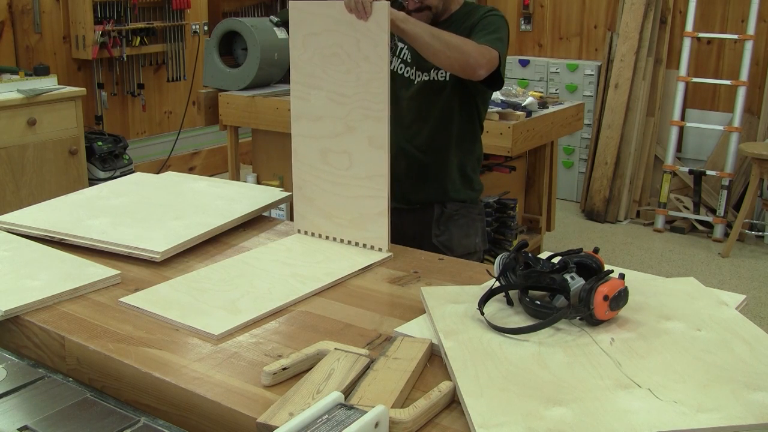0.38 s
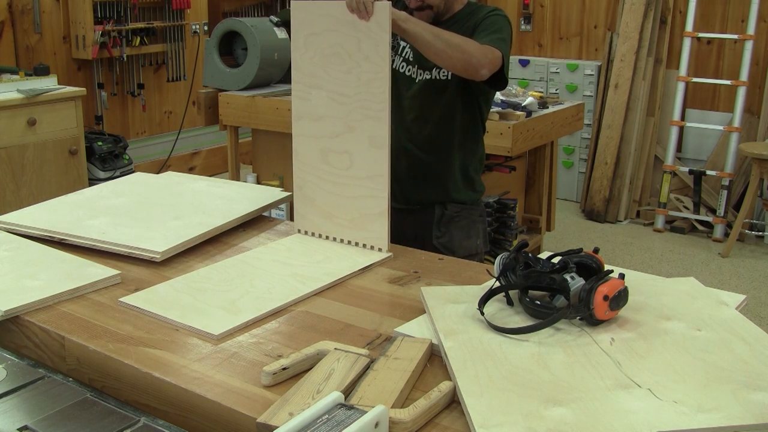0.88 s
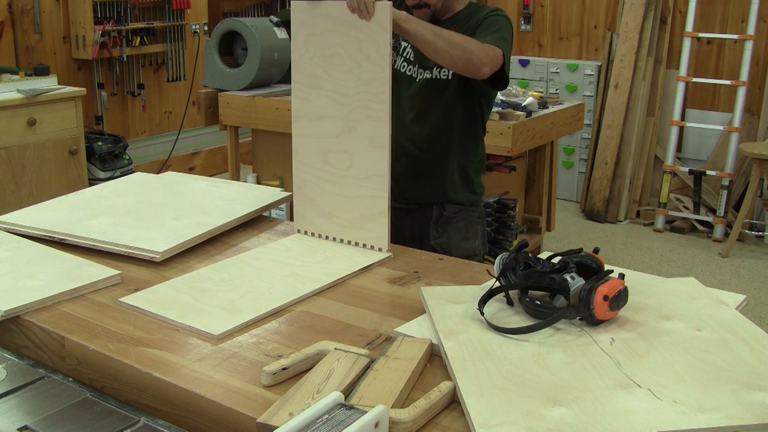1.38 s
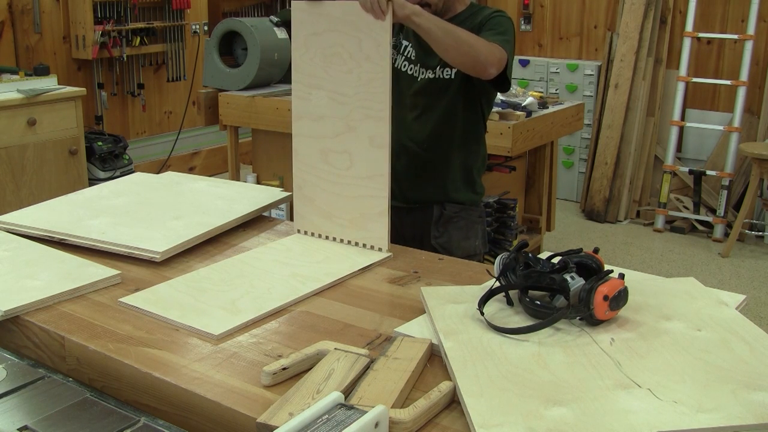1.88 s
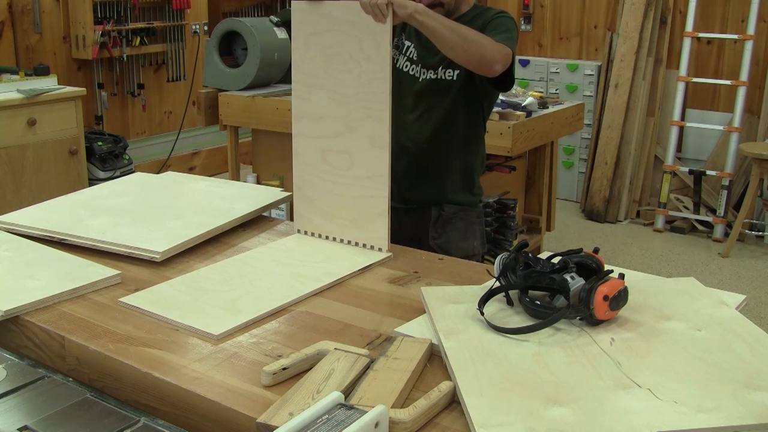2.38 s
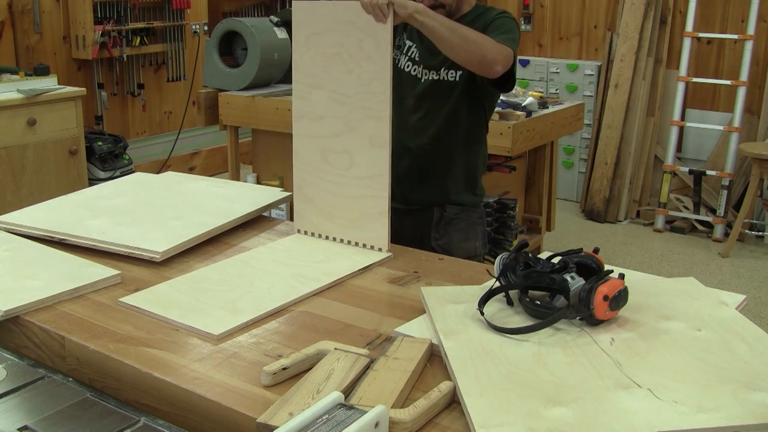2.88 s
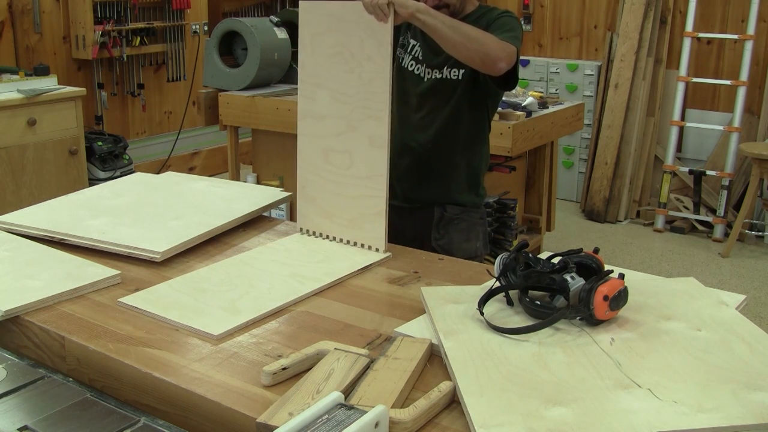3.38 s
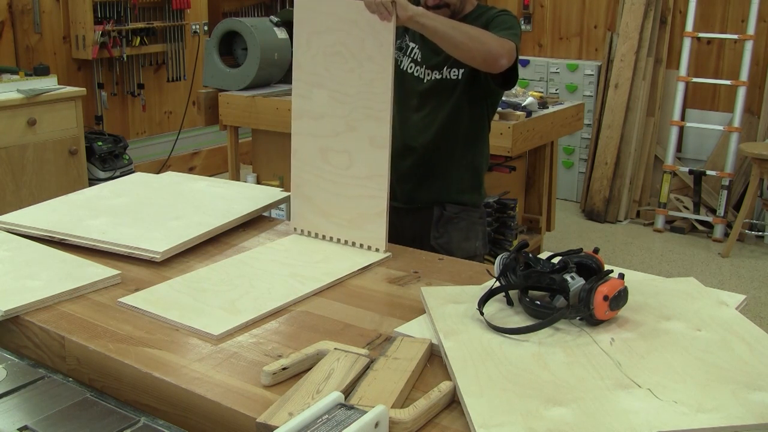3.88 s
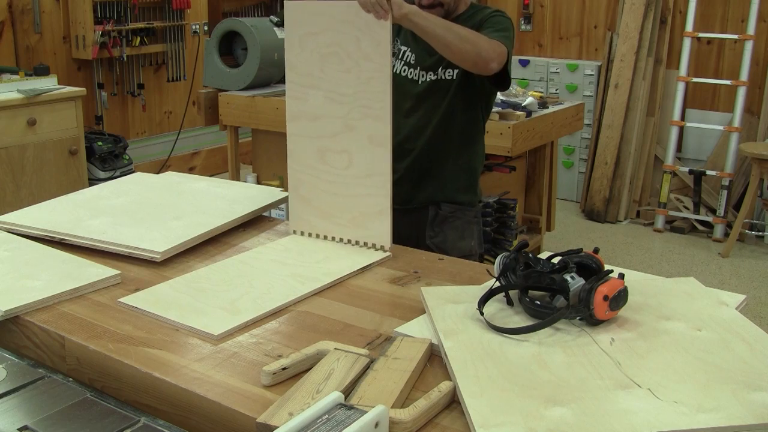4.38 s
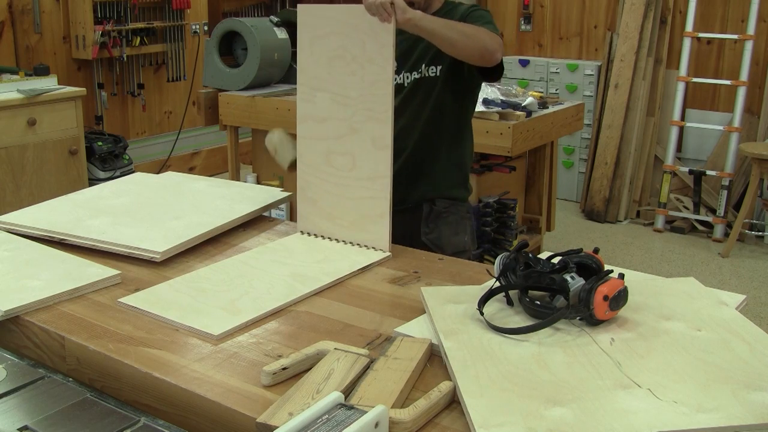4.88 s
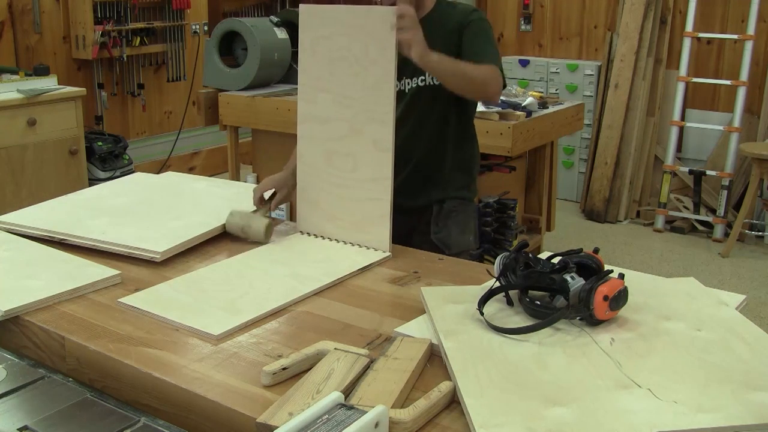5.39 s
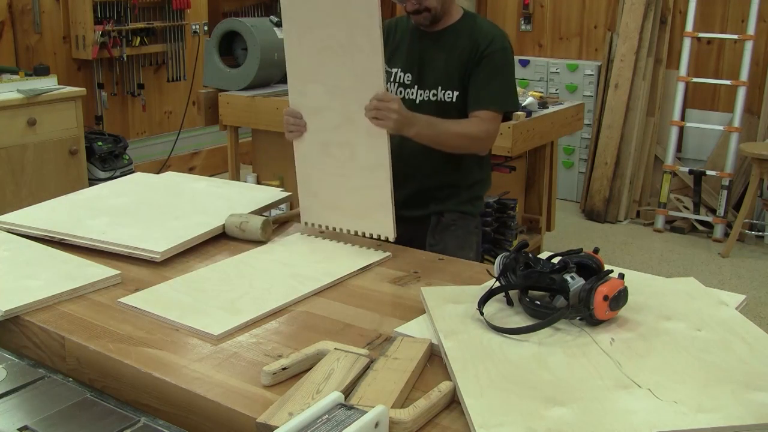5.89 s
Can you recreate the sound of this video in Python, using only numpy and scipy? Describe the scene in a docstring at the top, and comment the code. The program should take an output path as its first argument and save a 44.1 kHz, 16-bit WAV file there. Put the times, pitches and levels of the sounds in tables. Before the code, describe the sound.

Heavy mallet blows knock a plywood board into its joint in a reverberant wooden workshop, rattling loose metal, then wood clatters down and hands rub.

```python
"""Plywood boards are knocked together on a bench in a wood-panelled workshop: short rough contacts ring them.
The blows shake loose metal tools, heard as ringing modes; a small hard piece clinks and a slipping joint ticks.
Boards and hands rub in between, as swelling strokes of grainy noise.
The room answers with dull echoes and a dense noise tail, over a steady room tone of coloured noise.
The recorder's limiter ducks at the loud knocks and lets the room swell back."""
import sys
import numpy as np
from scipy import signal
from scipy.io import wavfile
from scipy.ndimage import uniform_filter1d

SR = 44100
rng = np.random.default_rng(int(sys.argv[2]) if len(sys.argv) > 2 else 0)


def level_to_linear(level):
    """Convert decibel levels to linear amplitude factors, elementwise."""
    exponent = np.asarray(level, float) / 20
    return 10 ** exponent


def store_pcm(level_fs):
    """Save levels as 16-bit WAV."""
    pcm = np.round(np.clip(level_fs, -1, 1) * 32767).astype(np.int16)
    wavfile.write(sys.argv[1], SR, np.atleast_2d(pcm).T)


N = 265173  # length in samples


def rms_one(x):
    """Scale to rms 1."""
    return x / np.sqrt(np.mean(x ** 2) + 1e-20)


def at_hz(points, hz):
    """Read a table of (Hz, value) along log frequency."""
    table_hz, values = np.transpose(points)
    return np.interp(np.log(hz), np.log(table_hz), values)


def band(x, low_hz, high_hz):
    """Butterworth band-pass."""
    edges_hz = [low_hz, min(high_hz, .45 * SR)]
    return signal.sosfilt(signal.butter(2, edges_hz, "band", fs=SR, output="sos"), x)


def strike(times, levels_db, modes, spread_db):
    """Clicks set decaying resonators ringing, each mode with a random strength of its own per hit."""
    at = np.round(np.array(times) * SR).astype(int)
    out = np.zeros(N)
    chance = rng.standard_normal((len(at), len(modes)))
    for k, (hz, mode_db, t60_s) in enumerate(modes):
        clicks = np.full(N, 1e-18)  # never quite zero, which keeps the filter fast
        clicks[at] = level_to_linear(np.array(levels_db) + mode_db + spread_db * chance[:, k])
        radius = level_to_linear(-60 / (t60_s * SR))
        angle = 2 * np.pi * hz / SR
        out += signal.lfilter([0, np.sin(angle)], [1, -2 * radius * np.cos(angle), radius ** 2], clicks)
    return out


def banded_noise(colour, likeness, size, t60=None):
    """Half-octave bands of stereo noise, each with its own level, left-right likeness and, for a tail, decay."""
    out = 0
    edges_hz = 28 * 2 ** np.arange(0, 9.6, .5)
    white = rng.standard_normal((2, 2, size))
    t = np.arange(size) / SR
    for k, (low, high) in enumerate(zip(edges_hz, edges_hz[1:])):
        mid, side = band(white[k % 2], low, high)  # neighbouring bands take different noise
        hz = np.sqrt(low * high)
        alike = np.clip(at_hz(likeness, hz), -1, 1)
        stereo = np.sqrt(1 + alike) * mid + np.sqrt(1 - alike) * side * [[1], [-1]]
        fade = level_to_linear(-60 * t / at_hz(t60, hz)) if t60 else 1
        out = out + level_to_linear(at_hz(colour, hz)) * fade * stereo
    return out


# mallet blows on the upright board: start_s, level_db, tools_db (loose tools shaken)
BLOWS = [(0.3094, -16, -38), (.668, -14, -31), (1.050, -11.5, -48), (2.992, -10.5, -31), (3.421, -12, -37)]
# thump, thud, knock, crack of a middling blow, one row each: level_db, share (dB per dB of blow strength)
BLOW_PARTS = [(-15, 0.9), (-12.5, 1.26), (-14.5, 1.85), (-25, 1.78)]
# wood set down or bumped: start_s, level_db, pitch_hz (of the body), crack_db
KNOCKS = [(1.426, -30, 190, -43), (2.595, -67, 800, -85), (4.330, -43, 447, -54.5), (4.687, -21, 278, -48),
          (4.755, -34, 540, -31.5), (5.029, -47.5, 200, -90), (5.429, -45.5, 297, -66),
          (5.482, -26.5, 205, -71), (5.506, -27.5, 394, -57.5), (5.641, -18, 840, -56.5),
          (5.708, -28, 774, -58)]
# the joint ticks as it slips: start_s, level_db
TICKS = [(1.85, -74), (1.981, -75), (4.29, -75), (4.307, -64.5), (4.352, -53.5), (4.5, -60), (4.599, -58.5),
         (4.656, -55), (4.667, -45), (4.673, -46.5), (4.682, -43)]
# thump, thud, knock, crack of a tick: level_db (over the tick's own)
TICK_PARTS = [-4.5, -35, -.5, -5.5]
# thump, thud, knock, clack, crack, snap of a contact, one row each: low_hz, high_hz, contact_s (decay)
PARTS = [(120, 270, .004), (270, 540, .004), (540, 1250, .003), (1250, 4000, .0022), (4000, 9000, .0016),
         (9000, 16000, .0012)]


def part_levels():
    """A harder blow is brighter, a bump peaks at its body's pitch, a tick keeps one colour."""
    middling_db, body_fall_db_per_oct = -11.5, 9.5
    blow_direct_db, knock_direct_db, tick_direct_db = 29.5, 34.5, 32  # direct sound over room
    centres_hz = np.sqrt(np.prod(np.array(PARTS)[:3, :2], axis=1))
    rows = []
    for s, db, _ in BLOWS:
        parts = [base + share * (db - middling_db) for base, share in BLOW_PARTS]
        rows.append((s, *parts, blow_direct_db))
    for s, db, pitch_hz, crack_db in KNOCKS:
        octaves_off = np.abs(np.log2(centres_hz / pitch_hz))
        rows.append((s, *(db - body_fall_db_per_oct * octaves_off), crack_db, knock_direct_db))
    for s, db in TICKS:
        rows.append((s, *(db + np.array(TICK_PARTS)), tick_direct_db))
    times, thump, thud, knock, crack, direct_db = np.transpose(rows)
    clack = (knock + crack) / 2 - 1
    snap = crack - 7.5
    return times, np.array([thump, thud, knock, clack, crack, snap]), direct_db


def contacts():
    """Each contact is a few milliseconds of roughness up close; over all directions its colour is even."""
    times, levels_db, direct_db = part_levels()
    near, around = np.zeros(N), np.zeros(N)
    t = np.arange(1500) / SR
    rough = rng.standard_normal((len(times), len(PARTS), len(t)))
    for k, (low, high, contact_s) in enumerate(PARTS):
        bursts = band(band(rough[:, k] * np.exp(-t / contact_s), low, high), low, high)
        click = band(band(t == 0, low, high), low, high)  # the even version, sent to the room
        click = click / np.linalg.norm(click)
        for s, db, over_db, burst in zip(times, levels_db[k], direct_db, bursts):
            start = round(s * SR)
            near[start:][:len(t)] += level_to_linear(db + over_db) * burst / np.linalg.norm(burst)
            around[start:][:len(t)] += level_to_linear(db) * click
    # the struck edge is turned away, so the direct sound is duller than the room's
    near = signal.lfilter(*signal.butter(1, 6100, fs=SR), near)
    return near, around


# ringing modes of boards and bench: pitch_hz, level_db, t60_s
BOARD = [(218, -20, 1.8), (102, -20, .3), (175, -5, .12), (235, -3, .12), (295, 11, .1), (335, 6, .08),
         (405, -6, .1), (465, -10, .08), (552, -12, .08), (682, 7, .07), (830, -11, .06), (1030, -12, .05),
         (1260, -12, .06), (3390, 3, .1)]


def boards():
    """Each mode of the wood is driven by the part of the contact that lies at its pitch."""
    times, levels_db, _ = part_levels()
    part = np.searchsorted(np.array(PARTS)[:, 1], np.array(BOARD)[:, 0])
    return sum(strike(times, levels_db[k] - 40.5, [mode], spread_db=5.5) for k, mode in zip(part, BOARD))


# ringing modes of the loose metal tools: pitch_hz, level_db, t60_s
TOOLS = [(5458, -5, .2), (5540, -6, .15), (6218, -8, .12), (7321, -5, .17), (8017, -8, .15),
         (8135, -9, .15), (8218, -11, .12), (9485, -11, .15), (9975, -11, .12), (10845, -15, .12),
         (11725, -17, .12), (12170, -20, .1), (13370, -24, .12)]
# the tools touched between blows: start_s, level_db
RATTLES = [(1.849, -64), (1.981, -56), (2.079, -66), (4.755, -72)]


def tools():
    """Blows and light touches ring the high modes of the loose metal tools."""
    shaken = [(s, tools_db) for s, _, tools_db in BLOWS]
    times, levels_db = np.transpose(shaken + RATTLES)
    return strike(times, levels_db, TOOLS, spread_db=2.5)


# a small hard piece clinks: start_s, level_db
CLINKS = [(1.426, -39), (1.849, -61), (1.979, -63), (2.593, -69), (4.57, -60), (4.757, -39)]
# ringing modes of the piece: pitch_hz, level_db, t60_s
PIECE = [(1165, -4, .08), (1260, -6, .08), (1665, -4, .1), (2110, -1, .09), (2283, -4, .1), (2482, -7, .1),
         (2611, -2, .11), (3095, -11, .1), (3640, -14, .1), (4237, -15, .1), (6300, -18, .1)]


def clinks():
    """A small hard piece rings in short-lived modes."""
    times, levels_db = np.transpose(CLINKS)
    return strike(times, levels_db, PIECE, spread_db=3.5)


# boards and hands rubbing, one row a stroke: start_s, length_s, level_db
RUBS = [(1.777, 0.021, -67), (1.849, 0.011, -55), (1.918, 0.28, -61), (1.98, 0.0085, -59),
        (4.047, 0.013, -60.5), (4.11, .19, -64.5), (4.544, 0.31, -59), (5.228, 0.15, -63.5),
        (5.447, 0.13, -52), (5.66, 0.21, -48.5), (5.981, 0.067, -52.5)]
# colour of the rubbing: frequency_hz, density_db (per Hz, relative)
RUB_COLOUR = [(1760, 6), (3000, 4.5), (4530, 2), (4900, 4), (7400, -1), (12100, -8), (15500, -33),
              (17000, -72)]
# left-right likeness of the rubbing and the room's tail: frequency_hz, likeness (-1 to 1)
ROOM_LIKENESS = [(60, 0.98), (200, 1), (500, 0.95), (1500, 0.92), (5000, 0.78), (12000, 0.36)]


def rubbing():
    """Fine grit is grainy noise: each stroke swells fast, holds and dies away."""
    rise_db_per_s, fall_db_per_s = 593, 189
    t = np.arange(N) / SR
    start, length, db = np.transpose(RUBS)[:, :, None]
    before_s = np.maximum(start - t, 0)
    after_s = np.maximum(t - start - length, 0)
    level = level_to_linear(db - rise_db_per_s * before_s - fall_db_per_s * after_s).sum(axis=0)
    grit = banded_noise(RUB_COLOUR, ROOM_LIKENESS, size=N)
    flicker = rms_one(uniform_filter1d(rng.standard_normal(N), size=150))
    grain = level_to_linear(1.3 * flicker)
    return level * rms_one(grit * grain)


# single echoes from walls and ceiling: delay_s, level_db
ECHOES = [(.036, -20.5), (0.0648, -10), (.112, -7.5), (.127, -15)]


def echoes(x):
    """A few dull single reflections stand out of the tail."""
    dull = signal.lfilter(*signal.butter(2, 1500, fs=SR), x)
    return sum(level_to_linear(db) * np.pad(dull, (round(s * SR), 0))[:N] for s, db in ECHOES)


# decay of the room's tail: frequency_hz, t60_s
ROOM_T60 = [(60, 1), (150, 0.56), (400, 0.76), (1000, 0.88), (2500, 0.84), (6000, 0.75), (12000, 0.39)]
# colour of the room's tail: frequency_hz, density_db (per Hz)
ROOM_COLOUR = [(40, -25), (120, -5.5), (300, 5.5), (800, -2.5), (2000, 1.5), (5000, -10), (10000, -8),
               (13000, -7.5), (17000, -47)]


def workshop(x):
    """The room answers with a dense tail that builds up in some milliseconds and dies band by band."""
    tail = banded_noise(ROOM_COLOUR, ROOM_LIKENESS, size=SR, t60=ROOM_T60)
    build_up_s = 0.0038
    tail *= 1 - np.exp(-np.arange(SR) / (build_up_s * SR))
    return signal.fftconvolve(x[None], tail, axes=1)[:, :N]


# colour of the room tone: frequency_hz, density_db (per Hz, relative)
AIR = [(18, -60), (30, -15), (187, -2), (208, -20), (256, -1), (767, -1), (1110, -3.5), (1230, 1),
       (1470, -8), (2070, -13.5), (2830, -19), (14000, -34), (15500, -34), (17000, -81)]
# left-right likeness of the room tone: frequency_hz, likeness (-1 to 1)
AIR_LIKENESS = [(60, 0.8), (240, -0.44), (950, -0.27), (3770, 0.15), (15000, 0.11)]


def room_tone():
    """Steady coloured stereo noise lies under everything."""
    return level_to_linear(-53.5) * rms_one(banded_noise(AIR, AIR_LIKENESS, size=N))


def scene():
    """Wood and metal, near and through the room, with rubbing over the room tone."""
    near, around = contacts()
    wood = boards()
    metal = tools() + clinks()
    direct = near + level_to_linear(31.5) * wood + level_to_linear(1.5) * metal
    room = echoes(near) + workshop(around + wood + level_to_linear(-28) * metal)
    left_db = -.2  # the right gets the opposite
    balance = level_to_linear(np.array([[left_db], [-left_db]]))
    return direct * balance + room + rubbing() + room_tone()


def top_cut(x):
    """Nothing passes above the cut-off."""
    return signal.sosfilt(signal.butter(12, 16660, fs=SR, output="sos"), x)


def record(dry):
    """A limiter ducks in a few milliseconds and recovers at a steady rate; what slips past is rounded off."""
    ceiling_db, release_db_per_s, attack_s = -7.5, 106, 0.0042
    ramp = release_db_per_s * np.arange(N) / SR
    over_db = np.maximum(20 * np.log10(np.abs(dry).max(axis=0) + 1e-9) - ceiling_db, 0)
    # hold each peak and let it fall along the ramp
    held_db = np.maximum(np.maximum.accumulate(over_db + ramp) - ramp, 0)
    smooth = np.exp(-1 / (attack_s * SR))
    duck_db = signal.lfilter([1 - smooth], [1, -smooth], held_db)
    ducked = dry * level_to_linear(-duck_db)
    top = .75  # full swing of the rounding
    rounded = top * np.tanh(ducked / top)
    mix = signal.lfilter(*signal.butter(1, [144, 11800], "band", fs=SR), rounded)  # the microphone's range
    return top_cut(mix)


dry = scene()
out = record(dry)
store_pcm(out)
```